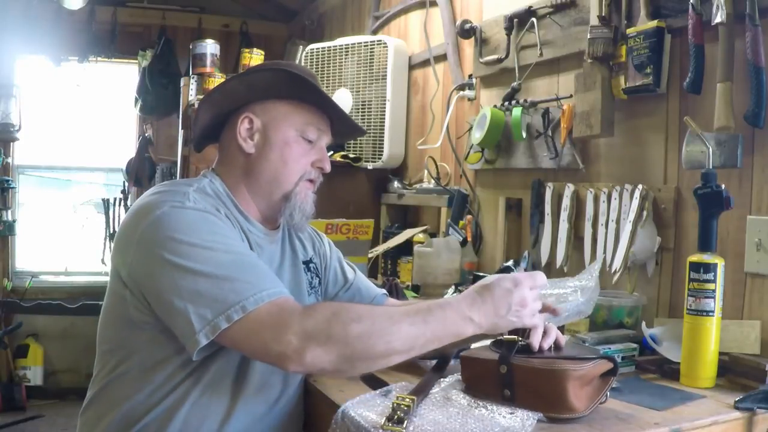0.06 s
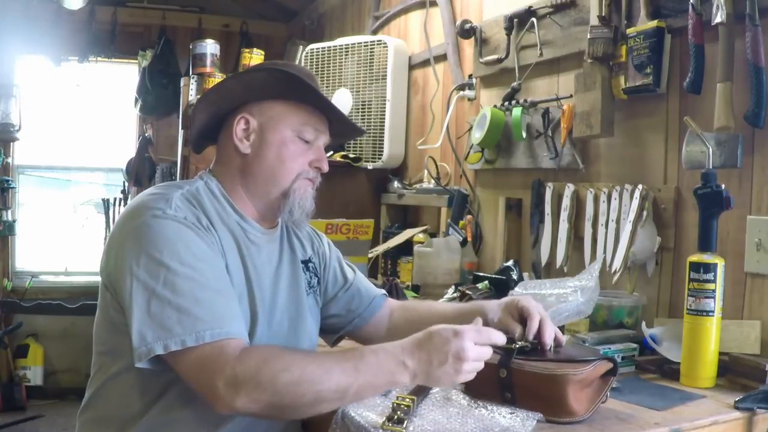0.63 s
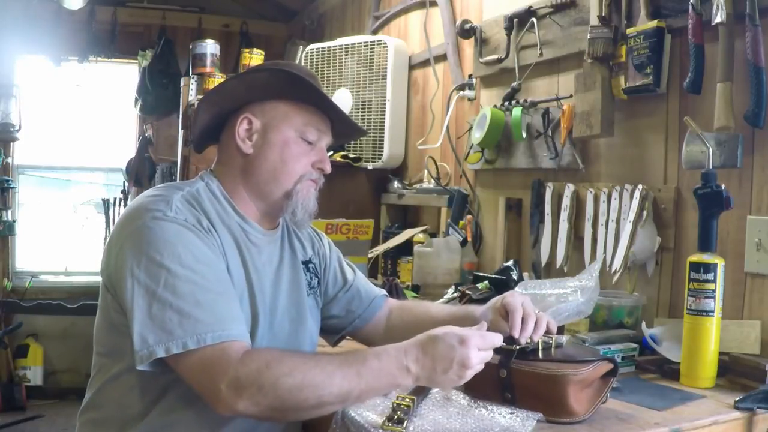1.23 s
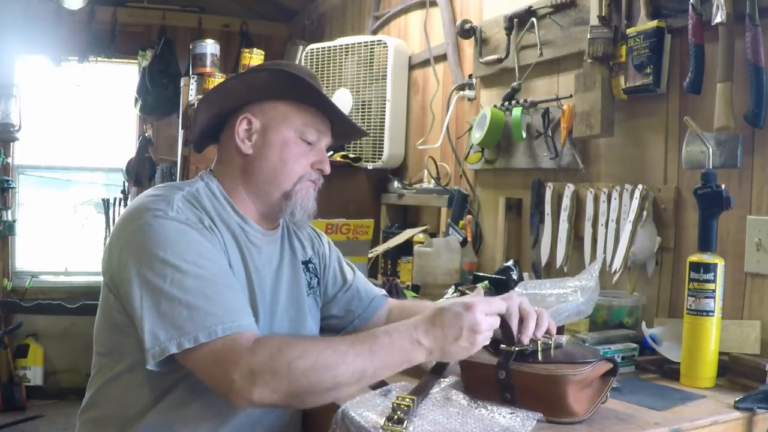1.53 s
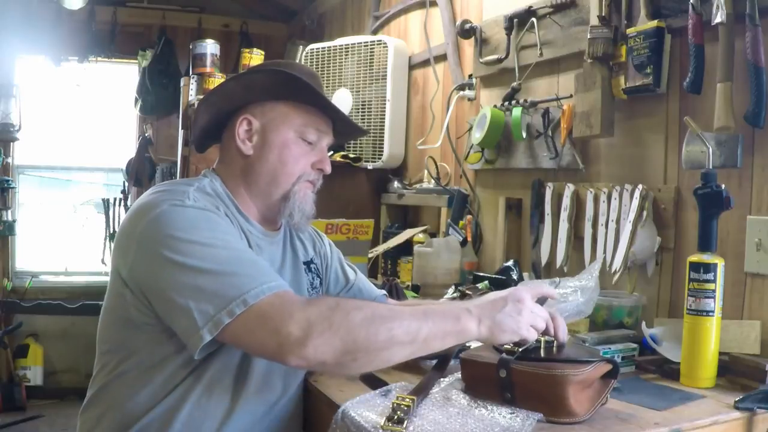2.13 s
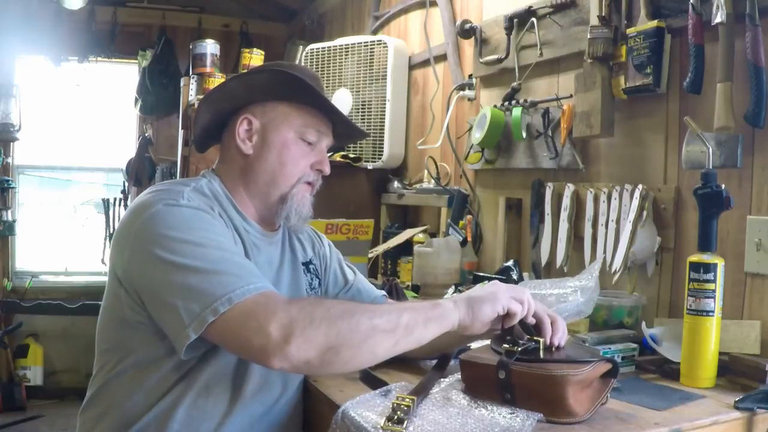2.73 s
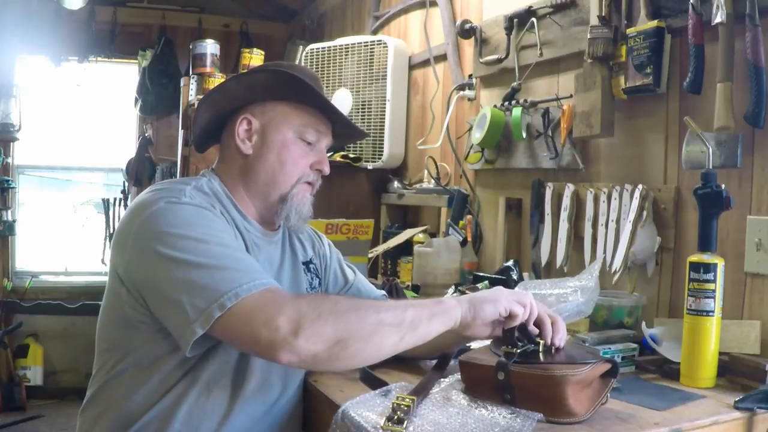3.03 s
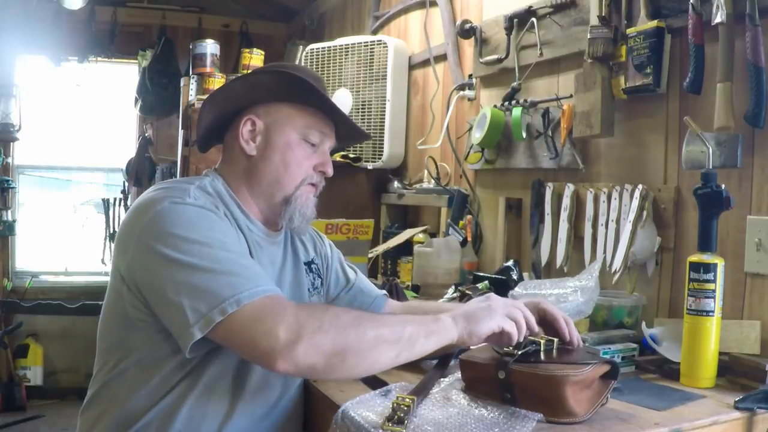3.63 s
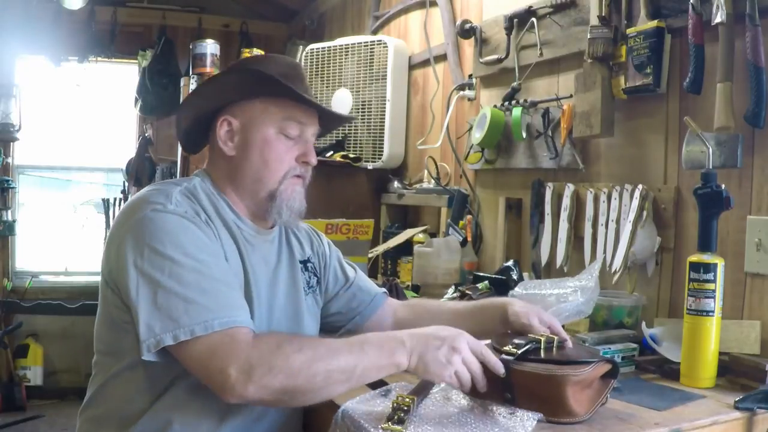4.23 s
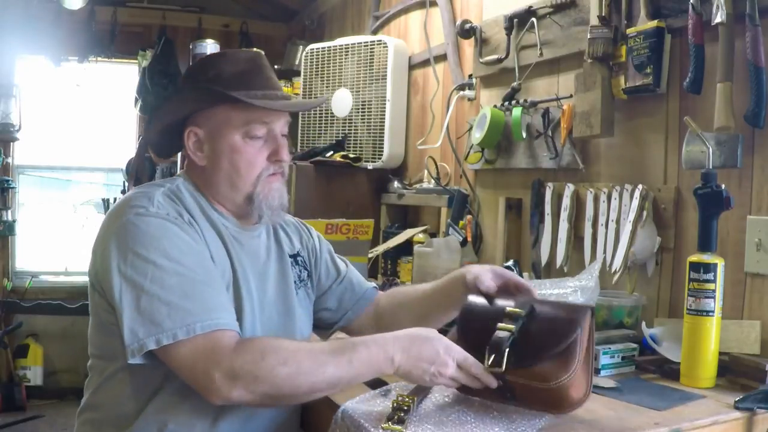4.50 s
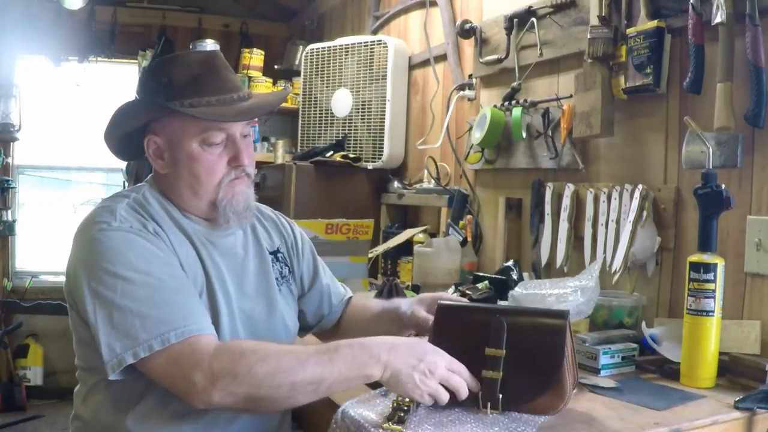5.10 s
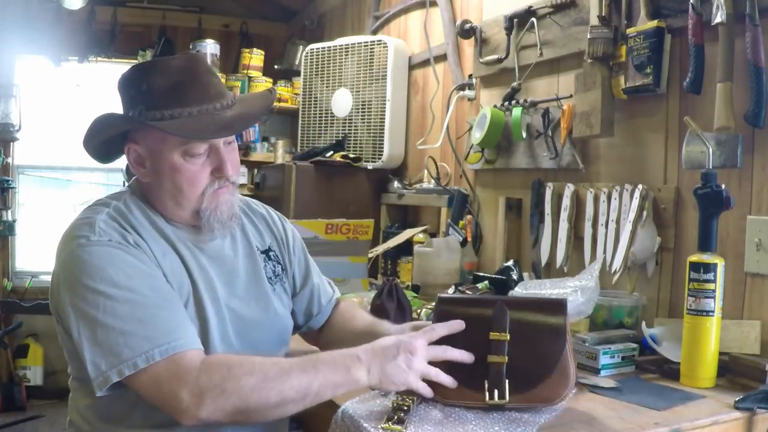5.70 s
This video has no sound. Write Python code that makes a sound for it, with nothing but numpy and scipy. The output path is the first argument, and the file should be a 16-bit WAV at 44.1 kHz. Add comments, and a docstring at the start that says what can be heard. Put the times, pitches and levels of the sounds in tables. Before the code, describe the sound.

A low, wavering hum and soft hiss run throughout in a small wooden workshop with a short echo. At the start a leather strap rubs quietly and gives two dry ticks. A metal buckle clinks, high and damped, at about 0.7 and 1 second, the second time with a light bump of the bag. From 1.5 to 2 seconds the strap slides, squeaks thinly and creaks, followed by small clinks and a dull knock. After a lull, hollow knocks, ticking leather slips and more clinks come between 3.2 and 4 seconds. Leather rubs and bumps around 4.5 seconds. At about 5 seconds the bag lands on the bench with a deep thud, by far the loudest sound, briefly overloading the microphone, with a leather smack and buckle clinks. A knock follows at 5.2 seconds, then a clink, a light bump and soft rubbing until about 5.8 seconds.

```python
"""Over a low hum and soft hiss, a stiff leather bag is bumped and its strap slides through a metal buckle.
The leather rubs, squeaks and creaks in tiny catches; the buckle's tongue and frame clink, damped by
fingers. Dull hollow knocks fill the small wooden workshop, and light bumps ring the bag. At last it is
set down on the bench, edge first, with a thud that overloads the microphone."""
import sys
import numpy as np
from scipy import signal
from scipy.fft import rfft, irfft, next_fast_len
from scipy.io import wavfile
from scipy.ndimage import uniform_filter1d

SR = 44100
rng = np.random.default_rng(int(sys.argv[2]) if len(sys.argv) > 2 else 0)


def transcribe(u):
    """Save the signal u as a 16-bit wav file named by the first command-line argument.

    u: samples, shape (n,) or (channels, n), limited to [-1, 1]; the rate is SR.
    q: integer samples, one column per channel.
    """
    v = np.clip(np.atleast_2d(u).T, -1, 1)
    q = np.round(v * 32767).astype(np.int16)
    wavfile.write(sys.argv[1], SR, q)


N = 253619
TIME = np.arange(N) / SR
AGE = TIME[:SR // 3]  # time since a blow [s]

# tones of the hum: (pitch [Hz], level [dB], pitch wander [Hz])
HUM_TONES = [(39.2, -39, 2.91), (74.5, -46, 2.438), (99, -49.5, 1.54), (120, -58.5, 0.61)]
# colour of the rumble and hiss: (frequency [Hz], relative level [dB])
AIR_SPECTRUM = [(10, -26), (22, -4.5), (45, -3.5), (85, -7), (115, -17.5), (150, -17), (215, -22.5),
                (320, -23), (480, -27.5), (800, -28.5), (1560, -35), (4500, -38), (8000, -44), (15500, -49)]
# bumps of hands and bag on the bench: (time [s], level [dB], favoured pitch [Hz], relative slap [dB])
BAG_BUMPS = [(0.0604, -36.5, 576, 4.5), (1.0189, -30, 282, -4), (3.530, -38.5, 295, -12),
             (3.801, -31, 315, -1), (3.912, -39, 327, -5), (4.038, -39.5, 335, -26), (4.45, -39, 325, -10),
             (4.5939, -37.5, 297, -13), (4.645, -25, 367, -7), (4.677, -35, 360, -20),
             (4.811, -39.5, 350, 2.5), (5.215, -19, 307, -24), (5.523, -26.5, 293, -5)]
# modes of the hollow bag: (pitch [Hz], relative level [dB], t60 before damping [s])
BAG_MODES = [(159, -17, .12), (238, -22, .11), (314, 8, 0.1), (360.6, -2.5, 0.43), (458, 3.5, 0.11),
             (567, 4.5, 0.15), (730, -24, 0.092)]
# colour of a leather slap: (frequency [Hz], relative level [dB])
SLAP_SPECTRUM = [(80, -52), (280, 11), (480, 1), (800, -3), (1400, -8.5), (2100, -13.5), (3100, -13),
                 (6000, -28), (16000, -57)]
# sliding strokes of leather: (peak time [s], half length [s], level [dB], relative bag rustle [dB])
STRAP_STROKES = [(0.08, 0.035, -48.5, 3.5), (0.235, 0.14, -53, -1), (1.459, 0.043, -52.5, -9),
                 (1.606, 0.059, -51.5, -5), (1.794, 0.088, -51, -2), (3.49, 0.022, -49, -8),
                 (3.58, 0.13, -61.5, 9.5), (4.1, 0.06, -58.5, 6), (4.378, 0.089, -46.5, -1),
                 (4.529, 0.054, -40.5, -7.5), (4.914, 0.17, -62, 5), (5.02, 0.061, -45, 0),
                 (5.075, 0.037, -38.5, 9), (5.362, 0.038, -52, -3), (5.546, 0.096, -47, -1.5),
                 (5.732, 0.02, -41.5, -2)]
# colour of the rubbing strap: (frequency [Hz], relative level [dB])
RUB_SPECTRUM = [(400, 2.5), (1200, 2), (2500, -3.5), (4800, 5.5), (7000, -1.5), (10000, -6), (16000, -15)]
# colour of the rustling bag: (frequency [Hz], relative level [dB])
RUSTLE_SPECTRUM = [(60, -52), (170, 2.5), (320, 5.5), (700, -13.5), (1500, -10), (3000, -6.5), (8000, -30)]
# the strap jerks free in the frame: (time [s], peak before boost [dB], pitch [Hz])
STRAP_SLIPS = [(0.07, -33, 4170), (0.1715, -36.5, 4260), (3.3316, -34, 4220), (3.3915, -34, 3900),
               (3.5023, -38, 3250), (3.5628, -36.5, 3230), (3.617, -31.5, 3100)]
# colour of a slip's tick: (frequency [Hz], relative level [dB])
SLIP_SPECTRUM = [(500, 1), (2000, -24), (3200, 1), (4500, 4), (6000, -4), (8500, -6), (16000, -31)]
# buckle clinks: (time [s], level [dB], favoured pitch [Hz], relative tick [dB], relative overtones [dB])
BUCKLE_CLINKS = [(0.7359, -33, 4970, -22, -7), (1.0057, -44.5, 4960, -8, -17),
                 (1.0194, -37, 6640, -19, -12), (1.8871, -39.5, 6200, -7, -16),
                 (1.9143, -37, 4940, -11, -3.5), (1.923, -38.5, 6300, -19, -22), (3.796, -44, 6800, 5, -20),
                 (3.8047, -34, 6600, 0, -26), (3.904, -43.5, 6350, -8, -20),
                 (3.9254, -33.5, 6700, -12, -10), (4.2515, -43, 5970, -18, -23),
                 (4.988, -38.5, 5400, -12, 8), (5.046, -24, 5360, -13, 4), (5.101, -27, 5640, -13, -11),
                 (5.204, -42, 5000, -14, -18), (5.4846, -29, 5600, -7.5, -33)]
# modes of the buckle: (pitch [Hz], relative level [dB], t60 before damping [s])
BUCKLE_MODES = [(4660, -19, .13), (4785, 0.5, 0.12), (5290, -0.5, 0.21), (5460, 13.5, 0.17),
                (5300, 2, 0.14), (6150, 6, 0.089), (6610, 3, 0.058), (7550, 4, .1), (8900, -4, 0.084),
                (9900, -5, 0.18), (10520, -0.5, 0.12), (11960, -5, 0.087), (13920, -2, 0.062),
                (15240, -27, .1)]
# colour of the metal contact tick: (frequency [Hz], relative level [dB])
TICK_SPECTRUM = [(500, -3), (2500, -11), (4000, 4), (5200, -4.5), (7200, 9), (9000, -11), (16000, -16)]
# dull knocks: (time [s], level [dB], treble edge [Hz], bass shelf [dB], hold of the echoes [s])
HOLLOW_KNOCKS = [(1.604, -50, 2000, -20, .005), (2.041, -37, 1190, 4, 0.032), (3.171, -34, 1130, 1, 0.037),
                 (3.6527, -25.5, 1610, -2.5, 0.028), (4.5907, -33.5, 1640, 6, .001),
                 (5.2114, -24, 2180, 3.5, 0.0034)]
# base colour of a knock: (frequency [Hz], relative level [dB])
KNOCK_SPECTRUM = [(80, 1), (170, 1), (250, -2), (340, 4), (500, -3), (720, 2), (1200, -2), (1900, -6),
                  (2300, -13), (2900, -8.5), (7000, -14), (16000, -12)]
# modes of the hollow that the knocks ring: (pitch [Hz], relative level [dB], t60 before damping [s])
HOLLOW_MODES = [(323, -1, 0.48), (390, -1, .2), (489, 9, 0.31), (694, 2, 0.14), (716, -12, 0.12),
                (976, -0.5, 0.13), (1244, -4, 0.11)]
# the bag lands edge first, then settles: (time [s], thud level [dB], slap level [dB])
LANDING_HITS = [(5.04, -37, -15), (5.044, -2.5, -10), (5.0513, 4, -17), (5.056, -9.5, -12.5),
                (5.100, -10, -12.5)]
# modes of the loaded bench: (pitch [Hz], relative level [dB], t60 before damping [s])
BENCH_MODES = [(120.3, 0, .17), (145.6, 5.5, 0.093), (207, -1, 0.14), (255.4, -2, 0.098),
               (290.4, -3.5, 0.17), (317, -3, 0.047), (365, -10.5, 0.17), (462, -30, 0.5),
               (584, -17, 0.097), (656, -24, 0.14), (812, -21, .24)]


def amp(db):
    """Decibels to gain."""
    return 10 ** (np.asarray(db) / 20)


def crest(x, window=256):
    """Scale a hit so that its loudest window of samples has rms 1."""
    return x / np.sqrt(uniform_filter1d(x ** 2, window).max())


def colour(x, spectrum):
    """EQ a signal through (frequency [Hz], level [dB]) points, then scale it to rms 1."""
    hz, db = np.transpose(spectrum)
    bins = np.maximum(np.arange(len(x) // 2 + 1) * SR / len(x), 1)
    curve = amp(np.interp(np.log(bins), np.log(hz), db))
    shaped = irfft(rfft(x) * curve, len(x))
    return shaped / np.sqrt(np.mean(shaped ** 2))


def noise(spectrum, size=N):
    """Coloured noise of rms 1."""
    return colour(rng.standard_normal(next_fast_len(size)), spectrum)[:size]


def fade(t60):
    """Decay envelope of a hit: 60 dB down after t60 seconds."""
    return np.exp(-np.log(1000) * AGE / t60)


def wobble(rate_hz):
    """Random modulation that glides between values of spread 1."""
    knots = rng.standard_normal(8192)
    return np.interp(TIME * rate_hz, np.arange(len(knots)), knots)


def ring(modes, gains, damped_to, detune):
    """Struck modes, each slightly off pitch, with ring times cut to the share damped_to."""
    hz, db, t60 = np.transpose(modes)
    hz = hz * (1 + detune * rng.standard_normal(len(hz)))
    return sum(gain * fade(ring_s) * np.sin(2 * np.pi * pitch * AGE)
               for pitch, gain, ring_s in zip(hz, gains * amp(db), t60 * damped_to))


def struck(modes, hz, octaves):
    """The point of contact favours the modes near one pitch."""
    return np.exp(-(np.log2(np.array(modes)[:, 0] / hz) / octaves) ** 2)


def add(track, s, sound):
    """Mix a sound in at a time."""
    start = int(s * SR)
    track[start:start + len(sound)] += sound[:N - start]


def hum_tone(hz, db, wander_hz, waver_db=3.5, drift_rad=0.45):
    """One tone of the hum, wavering in level and pitch."""
    turns = np.cumsum(hz + wander_hz * wobble(1.3)) / SR
    level = amp(db + waver_db * wobble(6)) * np.sqrt(2)
    return level * np.sin(2 * np.pi * turns + drift_rad * wobble(8.8))


def room_tone(air_db=-40.5, lull_s=2.17, lull_half_s=0.39, lull_db=-11):
    """A hum over a bed of rumble and hiss; its deepest tone sinks for a moment."""
    deepest, *others = (hum_tone(*tone) for tone in HUM_TONES)
    lull = amp(lull_db * np.exp(-((TIME - lull_s) / lull_half_s) ** 2))
    air = amp(air_db + 0.5 * wobble(5.2)) * noise(AIR_SPECTRUM)
    return deepest * lull + sum(others) + air


def bumps(unfavoured_db=-7):
    """Light blows ring the hollow bag, each with a slap of leather on top."""
    out = np.zeros(N)
    for s, db, hz, slap_db in BAG_BUMPS:
        gains = amp(unfavoured_db) + struck(BAG_MODES, hz, octaves=0.42)
        body = crest(ring(BAG_MODES, gains, damped_to=0.75, detune=0.023))
        add(out, s, amp(db) * crest(body + amp(slap_db) * slap(t60=0.044, tail_db=3)))
    return out


def slap(t60, tail_db):
    """Leather meets a surface: a short smack, then the walls of the bag flutter out."""
    envelope = fade(t60) + amp(tail_db) * fade(t60=0.12)
    return crest(noise(SLAP_SPECTRUM, len(AGE)) * envelope)


def stroke(peak_s, half_s, skew=1.06):
    """Speed of a hand movement: it swells to 1 and dies away a little more slowly."""
    width_s = half_s * np.where(TIME < peak_s, 1 / skew, skew)
    return np.exp(-((TIME - peak_s) / width_s) ** 2)


def slide(grain_db=5, flutter_db=3):
    """The strap slides as a dense stream of tiny catches while the bag rustles along."""
    rub_level, rustle_level = np.zeros(N), np.zeros(N)
    for s, half_s, db, rustle_db in STRAP_STROKES:
        speed = stroke(s, half_s)
        rub_level += amp(db) * speed
        rustle_level += amp(db + rustle_db) * speed
    size = next_fast_len(N)
    catches = rng.standard_normal(size) * amp(grain_db * np.minimum(rng.exponential(size=size), 5))
    rub = rub_level * colour(catches, RUB_SPECTRUM)[:N]
    rustle = rustle_level * noise(RUSTLE_SPECTRUM)
    return (rub + rustle) * amp(flutter_db * wobble(90))


def slips(events, boost_db=2.5, chirp_db=-3):
    """Each time the strap jerks free, it gives a dry tick and a brief, rough chirp."""
    out = np.zeros(N)
    for s, db, hz in events:
        roughness = np.pi * wobble(270)[:len(AGE)]
        chirp = crest(fade(t60=0.041) * np.sin(2 * np.pi * hz * AGE + roughness))
        tick = crest(noise(SLIP_SPECTRUM, len(AGE)) * fade(t60=0.0083))
        slip = tick + amp(chirp_db) * chirp
        add(out, s, amp(db + boost_db) * slip / np.abs(slip).max())
    return out


def buckle(grip=0.38, unfavoured_db=-21, tongue_db=-5, overtones_above_hz=8000):
    """Tongue and frame tap and ring at nearby pitches; grip is the share of ring time the fingers leave."""
    out = np.zeros(N)
    is_overtone = np.array(BUCKLE_MODES)[:, 0] > overtones_above_hz
    for s, db, hz, tick_db, overtone_db in BUCKLE_CLINKS:
        contact = amp(unfavoured_db) + struck(BUCKLE_MODES, hz, octaves=0.076)
        gains = np.where(is_overtone, amp(overtone_db), contact)
        frame = ring(BUCKLE_MODES, gains, damped_to=grip, detune=0.0031)
        tongue = ring(BUCKLE_MODES, gains * amp(tongue_db), damped_to=grip * 1.1, detune=0.0213)
        tick = crest(noise(TICK_SPECTRUM, len(AGE)) * fade(t60=0.081))
        add(out, s, amp(db) * crest(crest(frame + tongue) + amp(tick_db) * tick))
    return out


def squeak(db=-48.5, low_hz=3450, top_hz=4350, half_s=0.028, waver=0.048, flutter_db=2.7):
    """For a moment the slips lock into a thin, unsteady pitch that rises and falls with the pull."""
    arch_hz = low_hz + (top_hz - low_hz) * stroke(peak_s=1.528, half_s=half_s)
    pitch_hz = arch_hz * (1 + waver * wobble(900))
    level = amp(db + flutter_db * wobble(200)) * stroke(peak_s=1.512, half_s=half_s)
    return level * np.sin(2 * np.pi * np.cumsum(pitch_hz) / SR)


def knocks(bass_hz=350, tail_t60=0.26, snap_db=-2, hollow_db=-6):
    """A hollow knock snaps once and rings; its reflections hold between the walls, then die away."""
    out = np.zeros(N)
    lead = SR // 100  # samples of space for the EQ to ring ahead of the attack
    for s, db, edge_hz, bass_db, hold_s in HOLLOW_KNOCKS:
        spectrum = [(hz, base_db - 10 * np.log10(1 + (hz / edge_hz) ** 5)
                     + bass_db / (1 + (hz / bass_hz) ** 2)) for hz, base_db in KNOCK_SPECTRUM]
        walls = np.minimum(fade(tail_t60) * np.exp(np.log(1000) * hold_s / tail_t60), 1)
        burst = rng.standard_normal(len(AGE)) * (walls + amp(snap_db) * fade(t60=0.046))
        knock = colour(np.roll(burst, lead), spectrum)
        add(out, s - lead / SR, amp(db) * crest(knock, window=1024))
        polarity = rng.choice([-1, 1], len(HOLLOW_MODES))
        hollow = ring(HOLLOW_MODES, polarity, damped_to=0.72, detune=0.015)
        add(out, s, amp(db + hollow_db) * crest(hollow))
    return out


def creak(start_s=1.771, count=7, gap_s=0.0135, first_db=-32, fade_db_per_s=95, hz=5070):
    """Pulled tight, the strap creaks in a run of slips, unevenly spaced and growing weaker."""
    gap_jitter, level_jitter, pitch_jitter = rng.standard_normal((count, 3)).T
    gaps = gap_s * np.exp(0.14 * gap_jitter)
    elapsed = np.cumsum(gaps) - gaps
    levels = first_db - fade_db_per_s * elapsed + 0.3 * level_jitter
    pitches = hz * (1 + 0.054 * pitch_jitter)
    return slips(zip(start_s + elapsed, levels, pitches))


def landing(contact_s=0.0023):
    """The weight of the bag drives the bench top; soft leather rounds each attack and adds a smack."""
    thud, smack = np.zeros(N), np.zeros(N)
    attack = 1 - np.exp(-AGE / contact_s)
    for s, thud_db, slap_db in LANDING_HITS:
        boom = ring(BENCH_MODES, gains=1, damped_to=0.81, detune=0.01) * attack
        add(thud, s, amp(thud_db) * crest(boom))
        add(smack, s, amp(slap_db) * slap(t60=0.096, tail_db=-8))
    return thud, smack


def room_echo(x, wet_db=-5.5, predelay_s=0.007, split_hz=4000):
    """Cluttered wooden walls give a short, dense echo whose treble dies first."""
    echoes = rng.standard_normal(len(AGE)) * (AGE > predelay_s)
    low = signal.sosfiltfilt(signal.butter(2, split_hz, fs=SR, output="sos"), echoes)
    tail = low * fade(t60=0.26) + (echoes - low) * fade(t60=0.2)
    return amp(wet_db) * signal.fftconvolve(x, tail / np.linalg.norm(tail))[:N]


def scene():
    """A nearly mono mix; only the clinks, landing smack and knocks lean a little to the right."""
    thud, smack = landing()
    clinks, knocking = buckle(), knocks()
    strap = slide() + slips(STRAP_SLIPS) + squeak() + creak()
    handling = bumps() + strap + clinks + smack
    mid = room_tone() + handling + room_echo(handling) + knocking + thud
    lean = amp(-38) * clinks + amp(-22.5) * smack + amp(-48) * knocking
    return np.array([mid - lean, mid + lean])


def record(dry, top_hz=15400):
    """The thud clips at full scale; a steep low-pass takes off the top."""
    lowpass = signal.ellip(10, 0.1, 70, top_hz, fs=SR, output="sos")
    return signal.sosfilt(lowpass, np.clip(dry, -1, 1))


dry = scene()
out = record(dry)
transcribe(out)
```